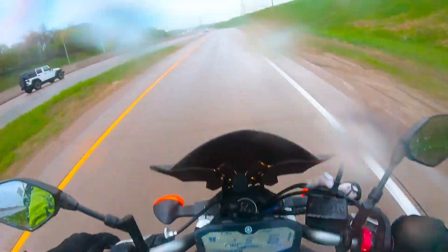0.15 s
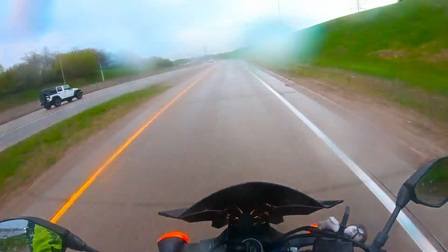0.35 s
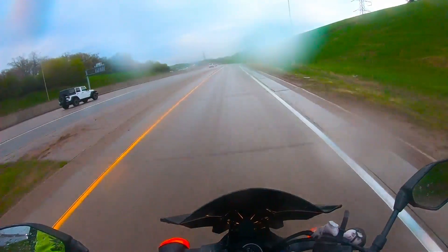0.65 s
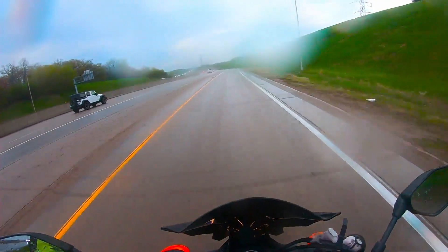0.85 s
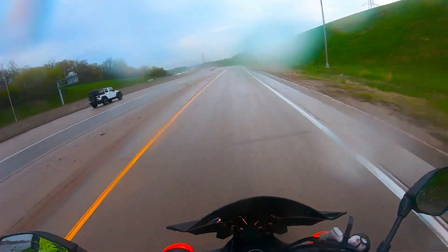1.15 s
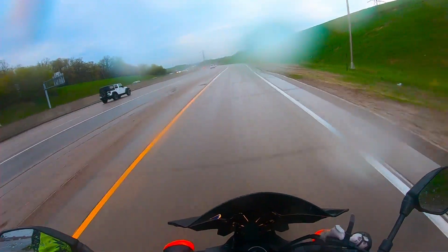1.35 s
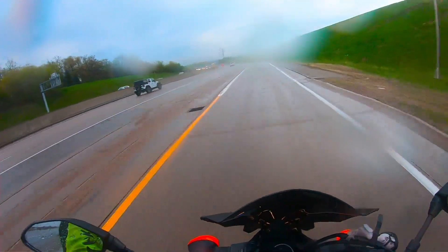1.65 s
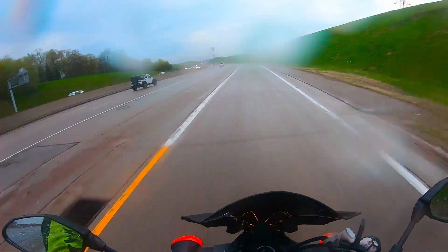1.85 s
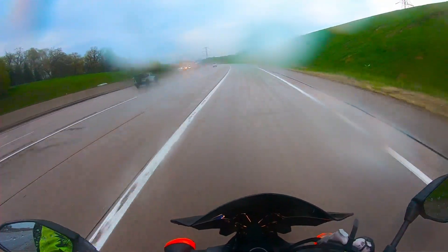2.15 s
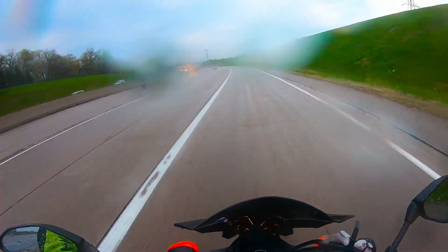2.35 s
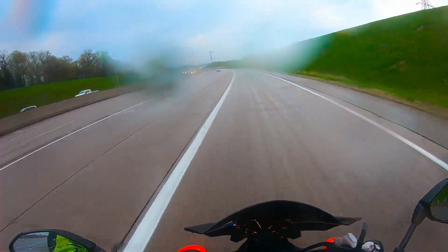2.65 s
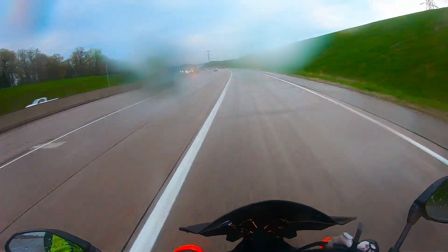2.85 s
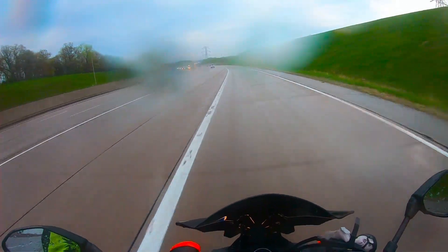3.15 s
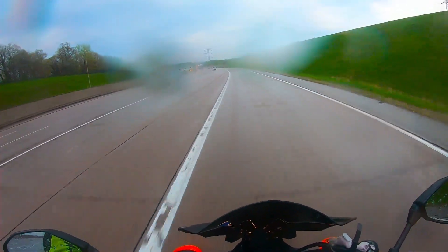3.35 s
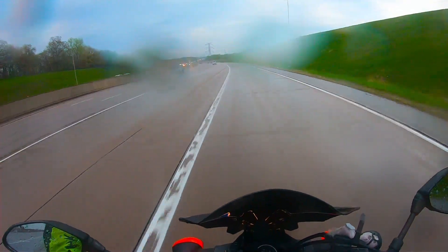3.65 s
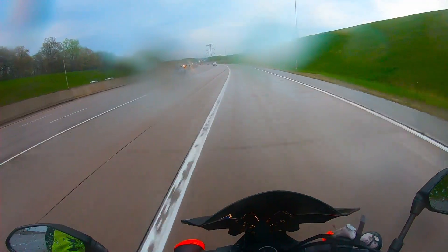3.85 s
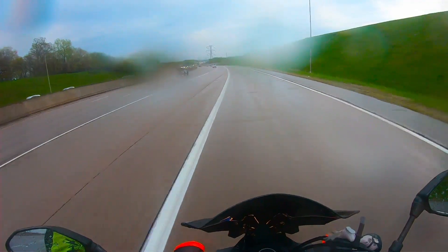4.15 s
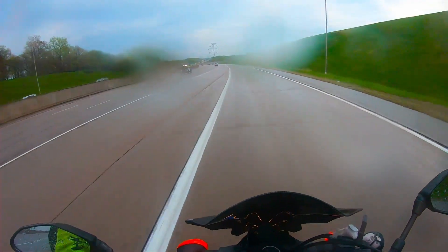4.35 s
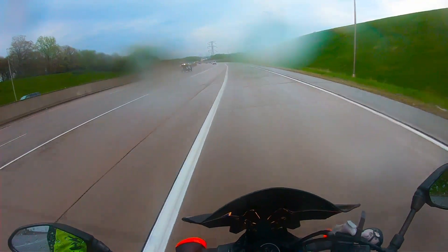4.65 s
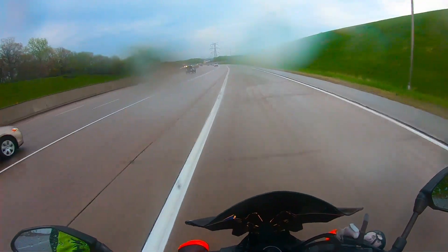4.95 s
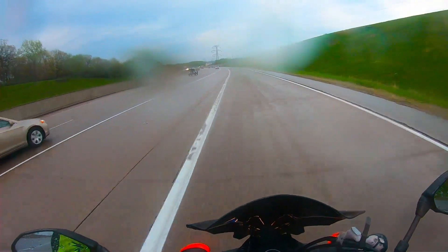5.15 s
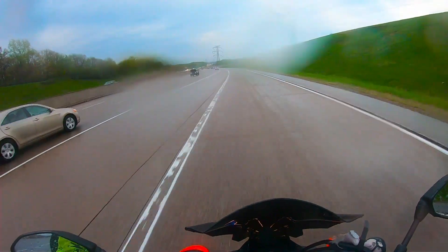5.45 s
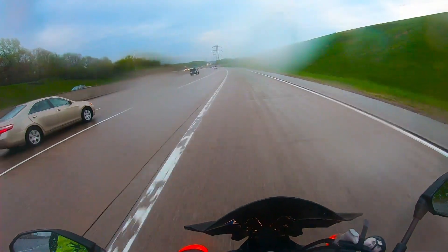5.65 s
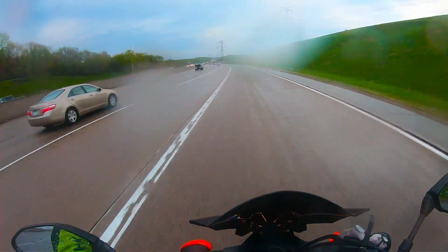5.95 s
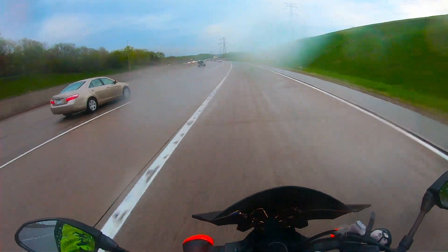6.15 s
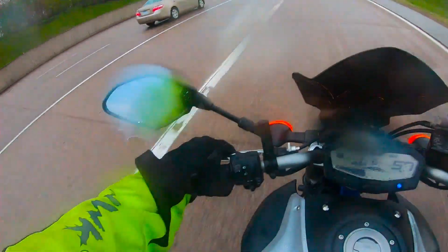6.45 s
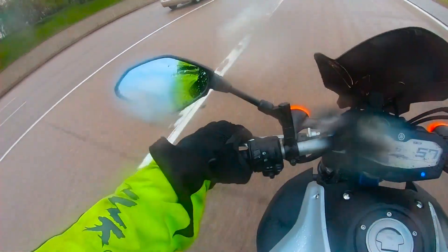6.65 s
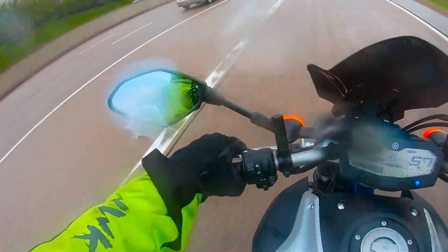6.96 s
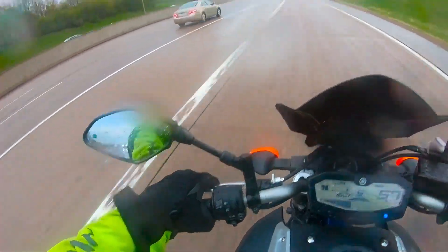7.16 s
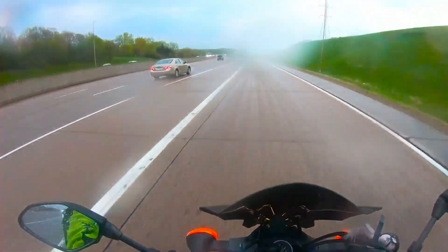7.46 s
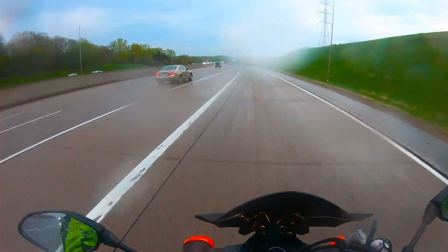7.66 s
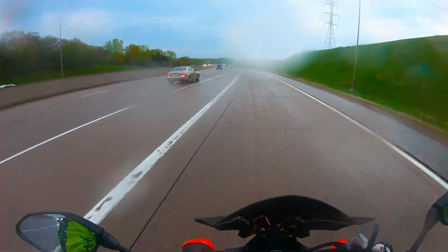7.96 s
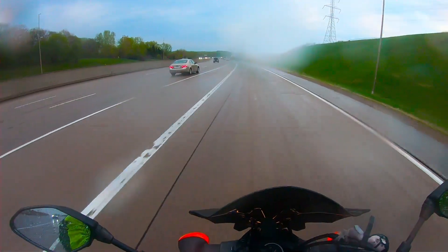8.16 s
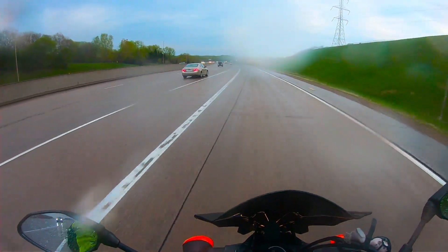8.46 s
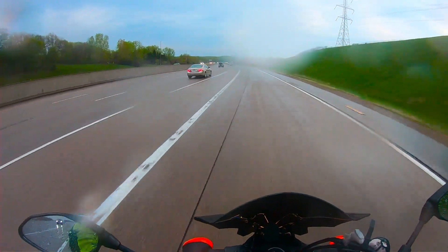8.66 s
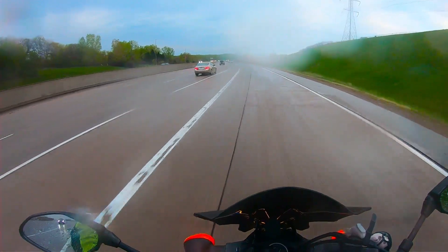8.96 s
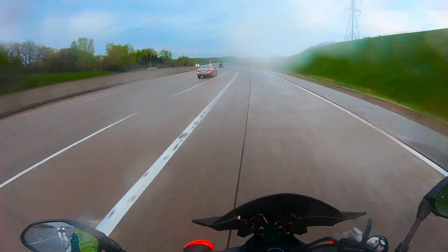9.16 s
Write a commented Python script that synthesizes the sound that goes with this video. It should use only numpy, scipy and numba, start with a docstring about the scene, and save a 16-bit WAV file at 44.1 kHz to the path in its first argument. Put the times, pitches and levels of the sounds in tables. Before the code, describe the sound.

Close, overloaded wind noise fills everything, outdoors on an open highway. The engine hums low for under a second before vanishing beneath a broad roar and airy hiss. The roar stays fairly even over throbbing low wobble, then turns muffled and violently bumpy for about a second as the rider looks down. Afterwards wind rushes back with ragged puffs and quick gusts.

```python
"""On a motorcycle at highway speed: wind over a microphone mounted on the rider's helmet.
Large eddies buffet the housing as band-limited noise and wandering vortex-shedding tones; small ones
rush over it in gusts and hiss in the port, as noise bands with shared flurries. Bursts strike the port,
a whorl hoots downward, and the colour changes as the head turns. The engine, a harmonic tone, drones
briefly through the wind, and the recorder's gain control rides the peaks."""
import sys
import numpy as np
from scipy import signal
from scipy.fft import rfft, irfft
from scipy.io import wavfile
from scipy.ndimage import uniform_filter1d
from numba import njit

SR = 44100
rng = np.random.default_rng(int(sys.argv[2]) if len(sys.argv) > 2 else 0)


def store_wav(level_fs):
    """Save 16-bit WAV to argv[1]."""
    pcm = np.round(np.clip(np.atleast_2d(level_fs), -1, 1) * 32767)
    wavfile.write(sys.argv[1], SR, pcm.T.astype(np.int16))


N = 410130  # samples, 9.3 s

# Engine firing. Each row: time in seconds, firing rate in Hz, level in dB before the harmonic levels.
ENGINE = [(0.0, 71.5, -30), (0.12, 78.5, -23.5), (0.21, 79.5, -23.5), (0.3, 81.8, -33)]
# Harmonics of the firing tone. Each row: multiple of the firing rate, level in dB.
ENGINE_HARMONICS = [(1, 5), (2, -14), (3, -23)]
ENGINE_FADE_S = 0.35  # fade after the last engine row

# Whorl of air sweeping past. Each row: time in seconds, centre in Hz, level in dB.
SWIRL = [(0.11, 1500, -51), (0.12, 1400, -30), (0.138, 1100, -28), (0.165, 850, -33), (0.19, 640, -29),
         (0.22, 600, -50)]

# Single eddies bursting on the port.
# Each row: start in seconds, peak level in dB, treble relative to that peak in dB.
PUFFS = [(0.006, -17, -26), (0.076, -15, -24), (0.132, -17, -26), (0.284, -26, -18), (5.335, -19, -25),
         (6.322, -17, -22), (6.409, -14, -25), (6.493, -13.5, -25), (6.541, -21, -35), (6.598, -18, -31),
         (6.645, -19, -32), (6.677, -13.5, -36), (6.719, -13.5, -25), (6.778, -20, -21.5),
         (6.811, -9.5, -34), (6.853, -16, -33), (6.883, -18, -26), (6.947, -16, -32), (7.028, -15.5, -31),
         (7.095, -16, -27), (7.153, -20.5, -19), (7.194, -18, -27), (7.242, -22, -18), (7.29, -18, -16),
         (7.331, -19, -17), (7.381, -24, -18), (7.472, -22, -27), (7.647, -20, -25), (7.734, -10, -25),
         (8.154, -28, -21), (8.473, -17, -27), (8.542, -22, -21), (8.711, -20, -21), (8.736, -25, -28),
         (8.799, -20, -21), (8.817, -22, -26), (8.839, -17, -23), (9.13, -22, -16)]
PUFF_RISE_S = 0.0021  # from the start of a burst to its peak
# Spectra of a burst's body and of its treble edge. Each row: frequency in Hz, relative density in dB per Hz.
PUFF_BODY = [(200, 10), (500, -2), (1500, -17), (3000, -35)]
PUFF_EDGE = [(2600, -13), (4300, -6), (6500, -22), (8500, -34)]

# Gusts that briefly lift the small eddies, and lulls that drop them.
# Each row: start in seconds, lift in dB before each band's sensitivity, length in seconds.
GUSTS = [(0.108, 3.5, 0.033), (0.162, 1, 0.025), (0.193, -2, .03), (0.235, 0, .03), (5.255, 0.5, 0.034),
         (5.32, 1.5, .03), (6.306, 4.5, .02), (6.37, -5, 0.046), (6.426, -2, 0.033), (6.558, -4, .03),
         (6.768, -0.5, .04), (6.828, -3, .022), (6.862, -3, .02), (6.921, -3, .027), (7.04, -1, 0.044),
         (7.105, -5, .012), (7.406, -7, .018), (7.455, -2, .017), (7.495, -3, .055), (7.555, 11.5, 0.038),
         (7.603, 3, 0.03), (7.75, -3, .04), (7.798, 9, 0.034), (8.45, -4, .03), (8.52, -3, .018),
         (8.493, 6.5, 0.022), (8.538, 14, 0.012), (8.588, 5.5, 0.051), (8.65, -6, .018), (8.695, 10, 0.031),
         (8.722, -10, .012), (8.763, -10, .03), (8.792, 6.5, 0.05), (8.843, -9, .012), (8.962, -3, .03),
         (9.052, -2, .04), (9.091, 11.5, 0.064), (9.166, 8, 0.051), (9.22, -8, 0.022)]
GUST_ATTACK_S = 0.0022  # time constant of the rise

# Small eddies as the head moves.
# Each row: time in seconds, rush level in dB, upper rush level in dB, port hiss level in dB.
RUSH = [(0, -41, -37, -54), (0.05, -40, -46, -55), (0.1, -43, -43, -44), (0.125, -29, -34, -45.5),
        (0.175, -27.5, -37, -40), (0.22, -29, -34, -37), (0.26, -29, -38, -42), (0.29, -24, -29, -37.5),
        (0.8, -24, -29.5, -35.5), (0.93, -24.5, -31.5, -35.5), (1.05, -23, -27.5, -35),
        (1.5, -23, -26, -35.5), (1.62, -24, -26.5, -37.5), (1.7, -22.5, -28, -39),
        (1.82, -23.5, -28.5, -41), (1.9, -23, -25, -38), (1.95, -22.5, -26.5, -35), (2.3, -22.5, -26, -35),
        (2.8, -22.5, -27.5, -37), (3.3, -23.5, -30, -36), (3.45, -25, -29, -38),
        (3.85, -23.5, -29.5, -36.5), (4.03, -24, -30, -38.5), (4.13, -23.5, -28.5, -36.5),
        (4.3, -24, -28, -36), (4.58, -23.5, -28.5, -38.5), (4.75, -22.5, -27, -36), (4.81, -22, -29, -37.5),
        (4.85, -26, -30, -45), (4.9, -22, -28.5, -37), (4.95, -23.5, -28, -41), (5.0, -22, -29.5, -36.5),
        (5.08, -24, -28.5, -43), (5.2, -21.5, -28, -39.5), (5.23, -23, -28.5, -36), (5.29, -22, -28.5, -35),
        (5.36, -24, -27.5, -37.5), (5.6, -24.5, -30.5, -38), (6.0, -24.5, -29, -38),
        (6.05, -26.5, -27, -45), (6.12, -21.5, -30, -41), (6.17, -24.5, -29.5, -35.5),
        (6.32, -23, -30, -41), (6.345, -28.5, -34, -43.5), (6.42, -28, -36, -43),
        (6.55, -27.5, -38.5, -46.5), (6.7, -29.5, -39.5, -47), (6.84, -35.5, -40.5, -50),
        (6.95, -31.5, -41.5, -47), (6.99, -40, -42.5, -50), (7.1, -44, -41.5, -47), (7.13, -29, -38, -49),
        (7.24, -28, -39, -46.5), (7.32, -26.5, -31, -45), (7.42, -26.5, -30.5, -44), (7.49, -28, -37, -51),
        (7.54, -26.5, -34, -58), (7.66, -23, -31, -50), (7.78, -26.5, -31.5, -54), (7.87, -24, -31.5, -49),
        (8.0, -22, -28, -48.5), (8.13, -25.5, -32, -50), (8.3, -25.5, -31.5, -48), (8.4, -26.5, -32.5, -54),
        (8.66, -25.5, -34.5, -58), (8.78, -24, -33.5, -61), (8.9, -26, -33.5, -52), (9.0, -28, -35.5, -59),
        (9.07, -27, -36, -53), (9.23, -27.5, -33.5, -50), (9.3, -25, -33, -47)]
# Air across the side of the housing. Each row: time in seconds, level in dB.
SIDE_FLOW = [(0, -43), (0.18, -46), (0.3, -41.5), (1.0, -40.5), (2.1, -39), (2.9, -39), (3.3, -40),
             (3.7, -41.5), (4.02, -40.5), (4.12, -39), (4.3, -42), (4.9, -37.5), (5.5, -42), (6.31, -39),
             (6.35, -47), (6.55, -50), (6.8, -54), (7.12, -52), (7.25, -51), (7.41, -39.5), (7.54, -41),
             (7.65, -39), (7.78, -36.5), (7.95, -36), (8.3, -35.5), (8.66, -38.5), (9.03, -38.5),
             (9.12, -41.5), (9.3, -39)]
# Raggedness of the small eddies, mostly greater while the head is turned from the stream.
# Each row: time in seconds, flurry depth in dB per unit of the flurry signal.
RAGGEDNESS = [(0, 3.5), (.3, 0.5), (3.5, 1.26), (6.2, 1), (6.4, 2), (7.3, 1.5), (7.6, 1.5), (9.3, 1.5)]
FLURRY_S = 0.078  # flurries even out over this time
WAVER_DB, PORT_WAVER_DB, WAVERS_PER_S = 0.65, 0.88, 20  # slower unsteadiness of each band alone
TURN_S = 6.34  # the head has turned: the low rush takes its other spectrum
# Spectra of the small eddies: low rush before and after the turn, upper rush, port hiss, side hiss.
# Each row: frequency in Hz, relative density in dB per Hz.
LOW_RUSH = [(330, -9.5), (520, -0.5), (1000, 0), (1400, -2), (2000, -35.5)]
TURNED_RUSH = [(330, -10), (520, -1.5), (720, 1), (1000, -1), (1400, -6), (2000, -37.5)]
HIGH_RUSH = [(1100, -15), (1600, -0.5), (1950, -3.5), (2300, -9), (2800, -16.5), (3500, -38)]
PORT_HISS = [(3300, -16.5), (3800, -4), (4400, -2.5), (5300, -8.5), (6600, -25), (8000, -36), (9000, -40.5)]
SIDE_HISS = [(1700, -23), (2500, -7), (3300, -8.5), (4300, -15), (5800, -19.5), (7000, -31.5), (9000, -43)]

# Large eddies. Each row: time in seconds, slow rumble level in dB, helmet wake level in dB,
# housing wake level in dB, flutter level in dB before gusts.
EDDIES = [(0, -1.5, -18, -23.5, -35), (0.11, -41, -17.5, -20, -29.5), (0.3, -25.5, -25.5, -24, -26),
          (0.7, -28, -22, -22.5, -23), (1.3, -32, -21, -22, -23.5), (1.75, -29, -23.5, -17.5, -23.5),
          (2.4, -29.5, -26.5, -21.5, -22.5), (3.1, -32, -23, -21.5, -20.5), (3.5, -21.5, -20, -20, -23.5),
          (4.15, -27, -18, -21.5, -24.5), (4.7, -23.5, -18, -23.5, -22.5), (5.4, -23.5, -20.5, -20.5, -25),
          (6.1, -25.5, -21, -21, -24.5), (6.27, -21, -20, -21.5, -26), (6.33, -25, -12, -22, -34),
          (6.43, -23, -17.5, -25, -30), (6.49, -21, -18, -21, -27), (6.55, -24, -14.5, -16, -19.5),
          (6.62, -20, -12.5, -19, -25.5), (6.7, -24, -16, -14, -20.5), (6.77, -22, -17, -15, -30),
          (6.82, -20, -18, -18.5, -20), (6.87, -26, -12, -18, -29), (6.93, -23, -19, -21, -26.5),
          (7.0, -21, -21, -15.5, -35), (7.1, -29, -14, -24, -34), (7.13, -24, -13, -17, -22),
          (7.2, -18, -19.5, -18.5, -24), (7.5, -24, -17.5, -18.5, -27), (7.95, -22, -19, -15, -24.5),
          (8.3, -29, -13.5, -19.5, -23.5), (8.6, -20, -19.5, -18, -26.5), (8.95, -22, -22.5, -14, -26),
          (9.3, -26, -21, -18, -38)]
SWELL_DB, SWELLS_PER_S = 0.4, 9.2  # each kind of large eddy swells and sinks on its own
# Shedding rates of the two wakes. Each row: time in seconds, helmet rate in Hz, housing rate in Hz.
SHEDDING = [(0, 84, 144), (0.3, 85.8, 151.4), (2.3, 90.3, 172.5), (2.9, 89.5, 162.6), (3.4, 90.4, 166),
            (3.7, 82.6, 158), (4.3, 92.3, 155), (5.2, 90.8, 159), (5.9, 96, 152.7), (6.4, 92, 154),
            (7.0, 92, 152), (7.4, 92.4, 167), (7.85, 86.4, 185.6), (8.2, 87.5, 158.5), (9.3, 91.3, 173.6)]
# Eddies shed in step: level against the noisy ones, log spread of their rate, how fast it roams.
LOCKED_DB, LOCK_WANDER, WANDERS_PER_S = -3.5, 0.3, 22
# Spectra of the rumble and the flutter. Each row: frequency in Hz, relative density in dB per Hz.
RUMBLE = [(12, -18), (24, -1.5), (33, -1.5), (42, -1), (56, 1), (66, -3.5), (80, -14)]
FLUTTER = [(190, -13.5), (260, -4.5), (350, -5), (450, -8.5), (700, -20.5)]

LOOK_AHEAD_S = 0.004  # the gain control acts this early on a thump
TOP_HZ = 9300  # upper edge of the recorder's band


def undb(db):
    """Decibels are logarithmic: 20 dB is a factor of ten in amplitude."""
    return 10 ** (np.asarray(db) / 20)


def unit(x):
    """Equal mean power: scale to rms 1."""
    return x / np.sqrt(np.mean(x ** 2))


def curves(table):
    """Linear interpolation turns each column after the time column into a signal."""
    s, *columns = np.transpose(table)
    return [np.interp(np.arange(N) / SR, s, column) for column in columns]


def coloured(points):
    """Spectral shaping: white noise weighted by a curve over log frequency, at rms 1."""
    hz, db = np.transpose(points)
    bins = np.maximum(np.fft.rfftfreq(N, 1 / SR), 1)
    gain = undb(np.interp(np.log(bins), np.log(hz), db, left=-120, right=-120))
    return unit(irfft(rfft(rng.standard_normal(N)) * gain, N))


def walk(rate):
    """Slow random modulation: levels held 1 / rate s and averaged twice, at rms 1."""
    hold = int(SR / rate)
    steps = np.repeat(rng.standard_normal(N // hold + 1), hold)
    return unit(uniform_filter1d(uniform_filter1d(steps, hold), hold)[:N])


@njit
def svf(x, hz, damp):
    """Resonance: state-variable band-pass with a moving centre; damp is width over centre."""
    y, band, low = np.empty(len(x)), 0., 0.
    for i in range(len(x)):
        g = np.tan(np.pi * hz[i] / SR)
        v = (band + g * (x[i] - low)) / (1 + g * (g + damp))
        band, low, y[i] = 2 * v - band, low + 2 * g * v, damp * v
    return y


@njit
def follow(x, attack, release, start):
    """Envelope detection: a peak follower, quick up and slower down."""
    e, out = start, np.empty(len(x))
    for i in range(len(x)):
        e += (x[i] - e) * (attack if x[i] > e else release)
        out[i] = e
    return out


def engine():
    """Periodic firing gives a harmonic tone, slightly unsteady in rate, that soon fades out."""
    hz, db = curves(ENGINE)
    phase = 2 * np.pi * np.cumsum(hz * (1 + 0.0081 * walk(7.1))) / SR
    tone = sum(undb(level) * np.sin(k * phase) for k, level in ENGINE_HARMONICS)
    fade = np.clip(1 - (np.arange(N) / SR - ENGINE[-1][0]) / ENGINE_FADE_S, 0, 1)
    return np.sqrt(2) * undb(db) * tone * fade


def swirl():
    """Moving resonance: as the wind rises, one whorl is heard as noise with a falling centre, a hoot."""
    hz, db = curves(SWIRL)
    hoot = unit(svf(svf(rng.standard_normal(N), hz, 0.35), hz, 0.35))
    passing = np.arange(N) < SWIRL[-1][0] * SR
    return undb(db) * hoot * passing


def puffs():
    """Impulsive turbulence: each burst of noise rises in milliseconds and dies away."""
    s, db, treble_db = np.transpose(PUFFS)
    start = (s * SR).astype(int)
    t = np.arange(int(.05 * SR)) / SR / PUFF_RISE_S
    shape = (t * np.exp(1 - t)) ** 1.3

    def envelope(level_db):
        strikes = np.zeros(N)
        np.add.at(strikes, start, undb(level_db))
        return signal.fftconvolve(strikes, shape)[:N]

    def even(x):  # level the noise so that every burst reaches its peak
        return x / np.sqrt(uniform_filter1d(x ** 2, int(3 * PUFF_RISE_S * SR)))

    body = envelope(db) * even(coloured(PUFF_BODY))
    edge = envelope(db + treble_db) * even(coloured(PUFF_EDGE))
    return body + edge


def gusts():
    """Transient flow: lift in dB with an exponential rise, a short hold and a quick fall."""
    t = np.arange(N) / SR
    lift = np.zeros(N)
    for s, db, length in GUSTS:
        age = np.maximum(t - s, 0)
        lift += db * (1 - np.exp(-age / GUST_ATTACK_S)) * np.exp(-(age / length) ** 4)
    return lift


def rush():
    """Small-scale turbulence: noise bands share gusts and quick flurries; each also wavers alone."""
    low_db, high_db, port_db = curves(RUSH)
    side_db, = curves(SIDE_FLOW)
    depth_db, = curves(RAGGEDNESS)
    lift_db = gusts()
    gust_db, lull_db = np.maximum(lift_db, 0), np.minimum(lift_db, 0)
    flurry = 0.2 * walk(45) + walk(180) + 0.6 * walk(600)
    flurry_db = depth_db * (flurry - uniform_filter1d(flurry, int(FLURRY_S * SR)))

    # each band has its own sensitivity to gusts, lulls and flurries
    low_db = low_db + 0.48 * gust_db + 0.26 * lull_db + flurry_db + WAVER_DB * walk(WAVERS_PER_S)
    high_db = high_db + 0.61 * lift_db + 0.97 * flurry_db + WAVER_DB * walk(WAVERS_PER_S)
    port_db = port_db + 0.74 * lift_db + flurry_db + PORT_WAVER_DB * walk(WAVERS_PER_S)
    side_db = side_db + 0.47 * gust_db + 0.27 * lull_db + 0.7 * flurry_db + WAVER_DB * walk(WAVERS_PER_S)

    before_turn = np.arange(N) < TURN_S * SR
    low = np.where(before_turn, coloured(LOW_RUSH), coloured(TURNED_RUSH)) * undb(low_db)
    high = coloured(HIGH_RUSH) * undb(high_db)
    port = coloured(PORT_HISS) * undb(port_db)
    side = coloured(SIDE_HISS) * undb(side_db)
    return low + high + port + side


def shed(hz, damp):
    """Vortex shedding: noise around a wandering rate, plus eddies in step whose rate roams widely."""
    locked_hz = hz * np.exp(LOCK_WANDER * walk(WANDERS_PER_S))
    locked = np.sqrt(2) * np.sin(2 * np.pi * np.cumsum(locked_hz) / SR)
    noisy_hz = hz * (1 + 0.064 * walk(6))
    noisy = rng.standard_normal(N)
    for _ in range(3):
        noisy = svf(noisy, noisy_hz, damp)
    noisy = unit(noisy / np.sqrt(noisy_hz))  # even power as the bandwidth moves
    return unit(noisy + undb(LOCKED_DB) * locked)


def buffet():
    """Large-scale turbulence: two shedding wakes thump the housing, over rumble and under flutter."""
    levels = [db + SWELL_DB * walk(SWELLS_PER_S) for db in curves(EDDIES)]
    rumble_db, helmet_db, housing_db, flutter_db = levels
    helmet_hz, housing_hz = curves(SHEDDING)
    helmet = undb(helmet_db) * shed(helmet_hz, 1.0)
    housing = undb(housing_db) * shed(housing_hz, 1.25)
    rumble = undb(rumble_db) * coloured(RUMBLE)
    flutter = unit(coloured(FLUTTER) * undb(0.4 * walk(40)))
    flutter = undb(flutter_db) * flutter * undb(0.25 * gusts())
    return helmet + housing + rumble + flutter


def scene():
    """Superposition: engine and wind add at one microphone."""
    return (engine() + swirl() + puffs() + rush() + buffet())[None]


def record(dry):
    """Compression and saturation: bass gain evens out thumps, peaks are rounded, the top is cut."""
    bass = signal.sosfiltfilt(signal.butter(2, 220, fs=SR, output="sos"), dry)
    start = np.max(np.abs(bass[0, :SR // 50]))
    # time constants: attack 3.4 ms, release 44 ms
    envelope = follow(np.abs(bass[0]), 1 / (0.0034 * SR), 1 / (0.044 * SR), start)
    ahead = int(LOOK_AHEAD_S * SR)
    envelope = np.pad(envelope[ahead:], (0, ahead), mode="edge")
    even = dry - bass + bass * (0.33 / envelope) ** 0.41  # unity gain where the envelope is 0.33
    soft = np.tanh(0.58 * even) / 0.62
    top = signal.ellip(8, .2, 70, TOP_HZ, fs=SR, output="sos")
    settled = signal.sosfilt_zi(top) * soft[0, 0]  # no onset transient from the filter
    return signal.sosfilt(top, soft[0], zi=settled)[0][None]


dry = scene()
out = record(dry)
store_wav(out)
```